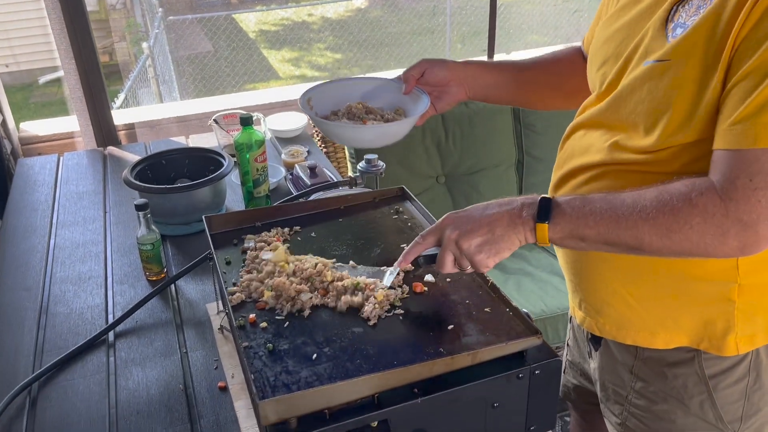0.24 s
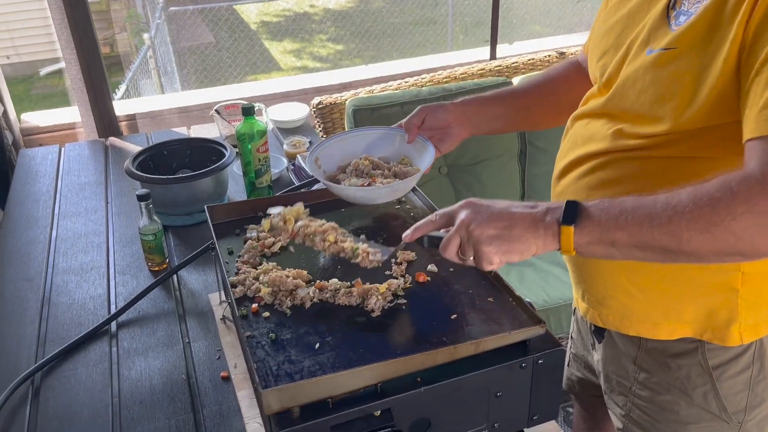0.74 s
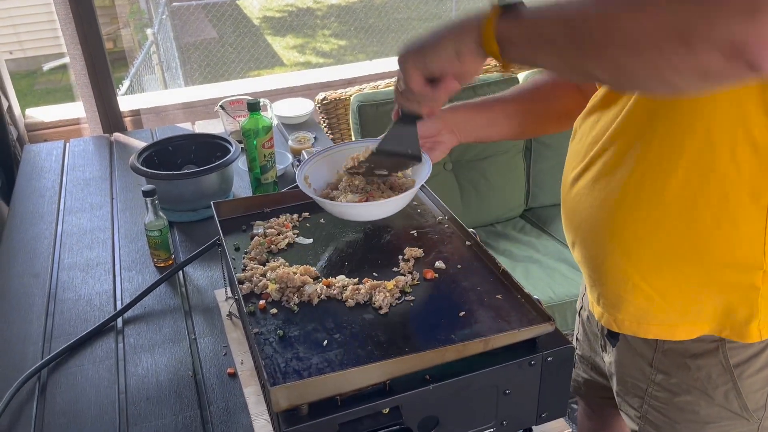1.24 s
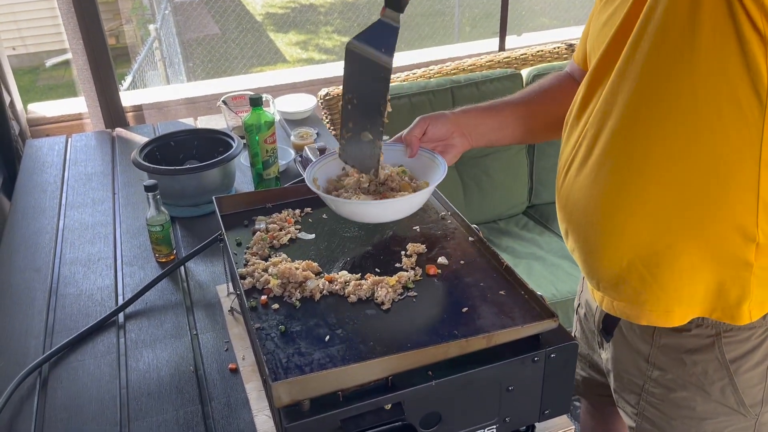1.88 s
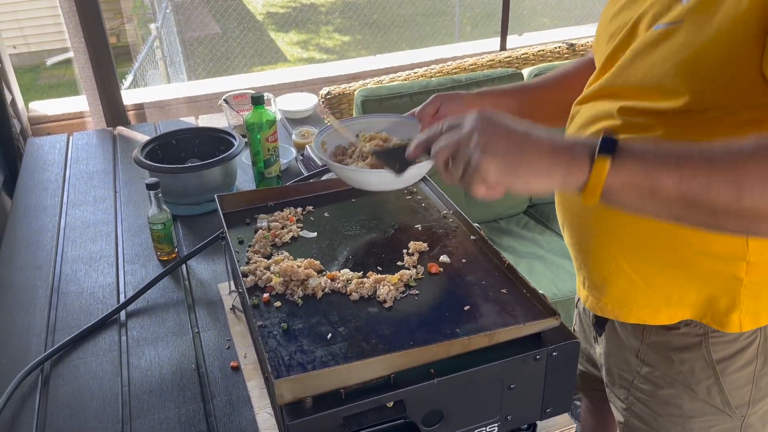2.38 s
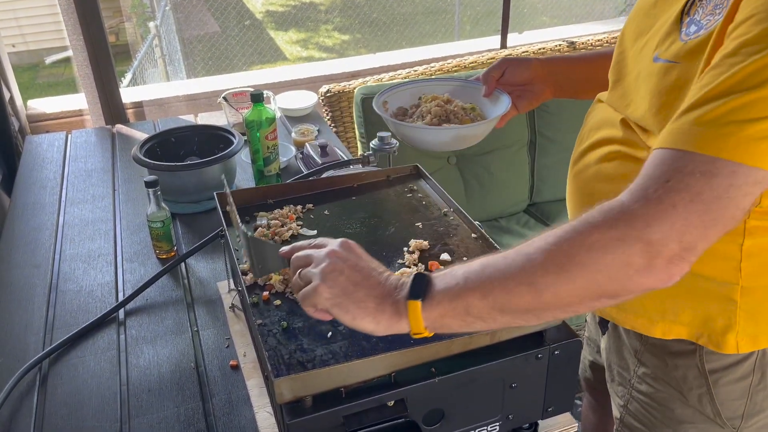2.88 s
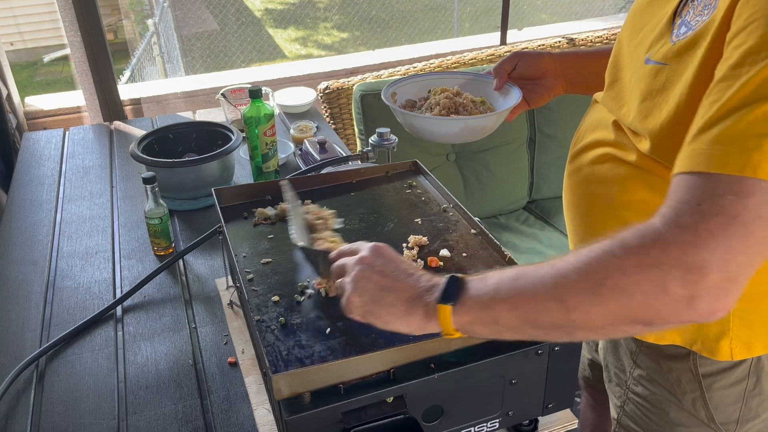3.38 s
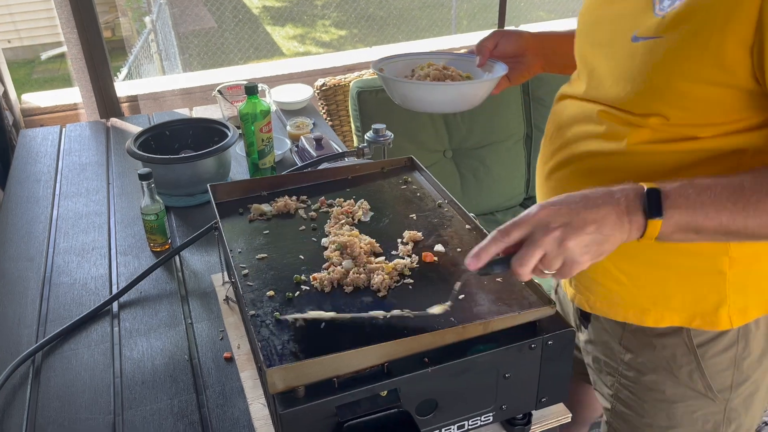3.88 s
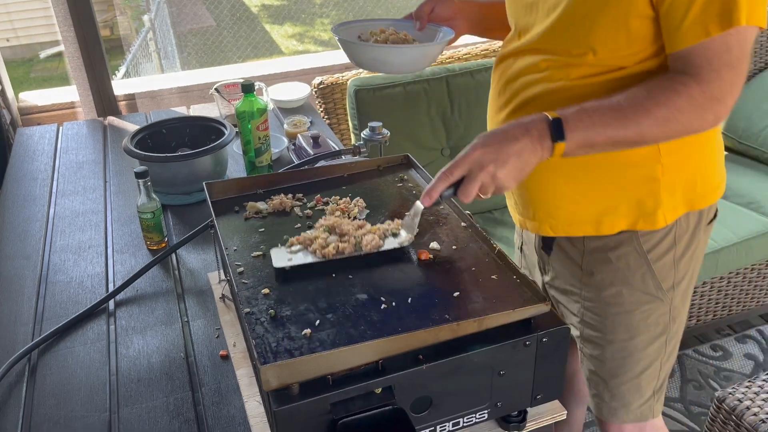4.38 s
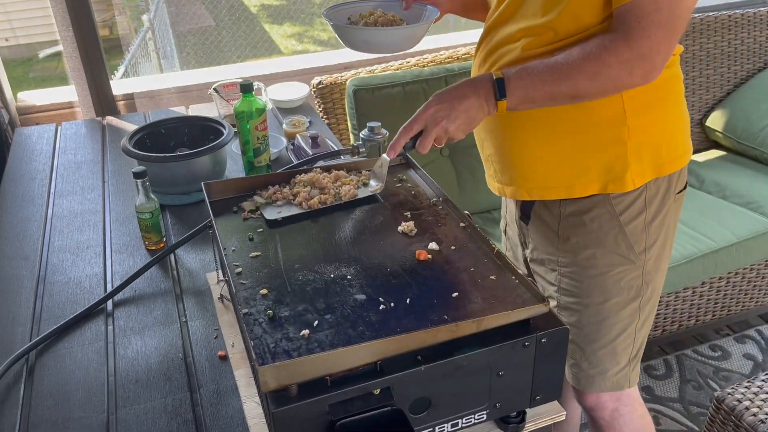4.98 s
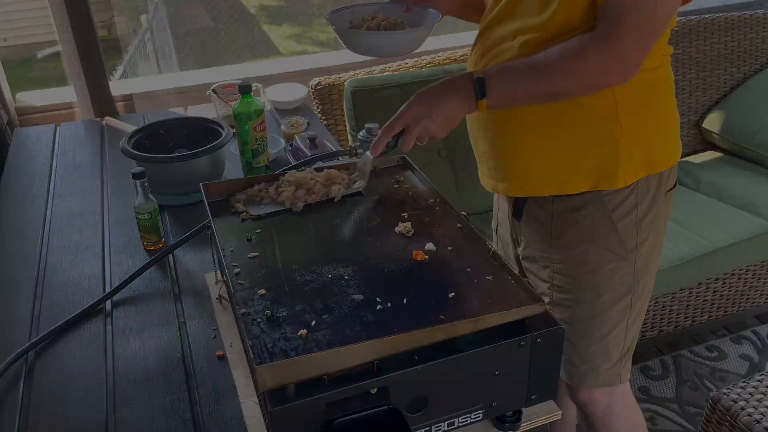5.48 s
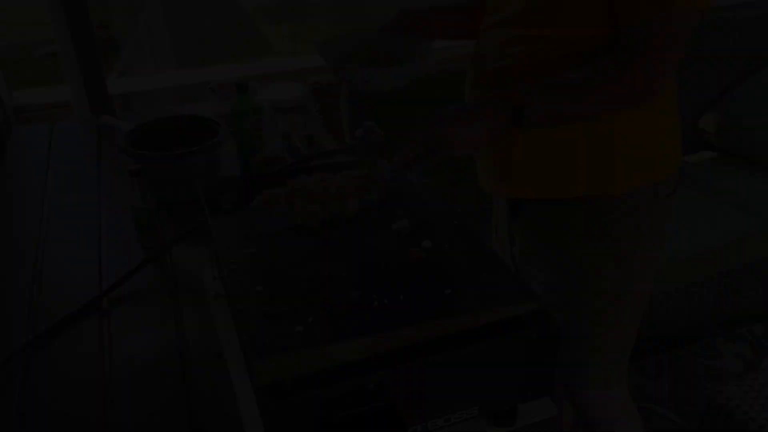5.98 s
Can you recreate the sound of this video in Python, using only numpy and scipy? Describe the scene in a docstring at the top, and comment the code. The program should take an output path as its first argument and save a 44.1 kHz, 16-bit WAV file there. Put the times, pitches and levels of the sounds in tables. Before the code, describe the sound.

Over a far-off mower drone, rice sizzles faintly as a spatula clangs, slaps and scrapes across a griddle.

```python
"""Fried rice on a porch griddle

Close on a stereo pair, a spatula scoops rice off a steel griddle: it clangs on the wall, slaps down
flat, scrapes and squeals along the plate and shoves the heap. The hot plate sizzles faintly and spits
under the porch's short echo. Birds chirp out in the yard; far off, a lawn mower drones in the open air."""
import sys
import numpy as np
from scipy import signal
from scipy.fft import rfft, irfft
from scipy.io import wavfile

SR = 44100
rng = np.random.default_rng(int(sys.argv[2]) if len(sys.argv) > 2 else 0)


def log_audio(samples):
    """Write samples as a 16-bit WAV file to the path given in sys.argv[1]."""
    # one column per channel
    frames = np.atleast_2d(samples).T
    # limit to full scale, then quantise
    limited = np.clip(frames, -1, 1)
    pcm = np.round(limited * 32767).astype(np.int16)
    wavfile.write(sys.argv[1], SR, pcm)


N = 275172
TIME = np.arange(N) / SR
TOP_HZ = 15600
# how alike the two microphones hear close sources, and distant ones: f/Hz, likeness/0-1
NEAR_LIKENESS = [(300, 0.98), (1400, 0.25), (4000, 0.45), (6500, 0.28), (8000, 1), (15000, 0.98)]
FAR_LIKENESS = [(60, 1), (140, 0.69), (290, 0.72), (640, 0.47), (1400, 0), (2000, 0.54), (4500, 0.24),
                (8000, 1)]


def spatula_blow(s, db, edge, modes_db, chatter_s=0.096, rise_s=0.0015):
    """The blade chatters briefly on the steel; an edge blow rings the griddle, a flat one the blade."""
    # modes of the griddle, and of the blade flat on the plate: f/Hz, level/dB, t60/s
    griddle_modes = [(357, -23.5, 0.38), (842, -13, 0.34), (1174, -19, 0.35), (1452, -13.5, 0.12),
                     (2074, -13, 0.27), (2493, -6.5, 0.15), (2945, -2, 0.11), (3174, -8, 0.097),
                     (3480, -5, 0.17), (3580, -2, 0.071), (4120, 0, 0.085), (4165, -6, 0.1),
                     (4500, -9, 0.14), (4824, -7, 0.1), (5400, -7.5, 0.1)]
    blade_modes = [(764, -4, 0.39), (1147, -8.5, 0.2), (1830, -6, 0.27), (2100, -6, 0.25), (2330, -4, 0.13),
                   (3570, -4.5, 0.15), (4100, -6, 0.17), (4748, -7, 0.2), (5970, -15, 0.085),
                   (6560, -3, 0.09)]
    # dense ring of the steel, struck on the wall or flat: f/Hz, level/dB
    wall_spectrum = [(150, -8.5), (450, -14.5), (620, -4), (900, -5.5), (1450, 0.5), (1750, -5),
                     (2500, 0.5), (4000, 4), (5300, -1.5), (6400, -3.5), (7500, -18), (10000, -7),
                     (12000, -28), (14000, -23), (15500, -51)]
    flat_spectrum = [(150, -10), (400, -8), (780, 0.5), (1100, 2.5), (1550, -6), (1900, 0), (3100, -3),
                     (4500, 0.5), (6000, -1), (8000, 0), (11000, -5), (15500, -19)]
    # decay of the dense ring: f/Hz, t60/s
    decays = [(300, 0.8), (900, 0.27), (2000, 0.23), (4000, 0.14), (8000, 0.11), (14000, 0.15)]
    crowd = steely(pair(dying_noise(decays), NEAR_LIKENESS))
    t = np.arange(crowd.shape[1]) / SR
    dense = edge * unit_rms(colour(crowd, wall_spectrum))
    dense += (1 - edge) * unit_rms(colour(crowd, flat_spectrum))
    modes = edge * ringing(griddle_modes, t) + (1 - edge) * ringing(blade_modes, t)
    contact = (1 - np.exp(-t / rise_s)) * (1 + .5 * np.exp(-(t / chatter_s) ** 2))
    ring = (dense + gain_of(modes_db) * modes) * contact * np.cos(np.pi / 2 * t / t[-1]) ** 2
    onset_rms = np.sqrt(np.mean(ring[:, t < .02] ** 2))
    return s, gain_of(db) * ring / onset_rms


def spatula_scrape(bite_s=4.089, lift_s=4.298, attack_s=0.0023, build_s=0.035, release_db_per_s=404,
                   hold_db=-31, slips_per_s=1000, judder_db=1.2, stiffening_hz=63.6, drift_hz=19):
    """Tiny slips of the edge hiss and ring the blade, which stiffens as it bends under the rice."""
    # resonances of the pressed blade: f/Hz, level/dB
    resonances = [(765, -4.5), (1160, -1.5), (1690, -3), (2130, -2), (2330, 1), (2760, 2), (2960, -1),
                  (3440, -1), (3980, 1), (4520, -2), (5130, 0), (5530, -0.5), (5850, -6), (6120, -0.5),
                  (6620, -2), (7070, -1)]
    # rasp of the edge: f/Hz, level/dB
    rasp_spectrum = [(200, -14), (1000, -7.5), (2300, -0.5), (5000, -0.5), (7000, -3.5), (8500, -11),
                     (9400, 9.5), (10400, -7), (11300, -3.5), (12600, -6), (14200, -2), (15200, -38)]
    # extra pressure as the blade meets the heap: middle t/s, half length/s, rise/dB
    pushes = [(4.191, 0.023, 4.5), (4.285, 0.02, 1.5)]
    t = np.arange(0, .4, 1 / SR)
    size, length_s = len(t), lift_s - bite_s
    push_db = swells(pushes, bite_s + t)
    pressure_db = hold_db - 7 * np.exp(-t / build_s) + push_db
    release_db = release_db_per_s * np.maximum(t - length_s, 0)
    pressure = np.minimum(t / attack_s, 1) * gain_of(pressure_db - release_db)
    bend_hz = stiffening_hz * np.minimum(t / length_s, 1) ** 2
    slips = unit_rms((rng.random(size) < slips_per_s / SR) * rng.standard_normal((2, size)))
    friction = pair(rng.standard_normal((2, size)) + .9 * slips, NEAR_LIKENESS)
    friction *= gain_of(judder_db * wander(80)[:size])
    ring = 0
    for hz, db in resonances:
        width_hz = 27 * np.sqrt(hz / resonances[0][0])
        # as the point of contact shifts, each resonance drifts and is caught more or less firmly
        catch = gain_of(db + 2.6 * wander(27)[:size])
        pitch = hz + bend_hz + drift_hz * wander(8.2)[:size]
        mode = resonate(resonate(friction, pitch, width_hz), pitch, 8 * width_hz)
        ring += catch * unit_rms(mode)
    # pushing harder brings out the rasp more than the ring
    rasp = unit_rms(steely(colour(friction, rasp_spectrum))) * gain_of(.35 * push_db)
    return bite_s, pressure * (gain_of(-5) * unit_rms(ring) + gain_of(-1.5) * rasp)


def spatula_squeals(waver_hz=13, roughness=.3):
    """The edge grabs the plate and drives one of the blade's resonances into a short, rough squeal."""
    # grabs of the edge: middle t/s, half length/s, f/Hz, level/dB
    grabs = [(4.157, 0.032, 4020, -39), (4.187, 0.028, 1715, -39.5), (4.19, 0.018, 2150, -40),
             (4.217, 0.02, 5230, -39), (4.255, 0.024, 3490, -39), (4.27, 0.018, 1777, -43),
             (4.28, 0.026, 5170, -42), (4.502, 0.041, 3460, -60), (4.5, 0.03, 5290, -59)]
    out = np.zeros(N)
    for s, half_s, hz, db in grabs:
        phase = 2 * np.pi * np.cumsum(hz + waver_hz * wander(80)) / SR
        tone = unit_rms(np.sin(phase) * (1 + roughness * wander(150)))
        out += tone * swells([(s, half_s, gain_of(db))], TIME)
    return out


def rice_shove(s, length_s, rise_s, db, low_hz, crumbs_per_s=900, octaves=2.97, release_db_per_s=220):
    """Rice cushions the blade: a rustle, crumbs of crust cracking and some of the griddle's hollow."""
    # hollow of the griddle under a heap of rice: f/Hz, width/Hz, level/dB
    hollow = [(603, 97, 18), (840, 46, 12), (1050, 23, 10.5), (1574, 290, 1), (2054, 120, 7), (2560, 89, 1),
              (3265, 55, 0)]
    t = np.arange(0, .3, 1 / SR)
    crumbs = unit_rms((rng.random(len(t)) < crumbs_per_s / SR) * rng.uniform(-0.69, 1, (2, len(t))))
    rub = unit_rms(pair(rng.standard_normal((2, len(t))) + gain_of(-1) * crumbs, NEAR_LIKENESS))
    ring = sum(gain_of(level) * resonate(rub, np.full(len(t), hz), width) for hz, width, level in hollow)
    band = signal.butter(2, [low_hz, min(low_hz * 2 ** octaves, TOP_HZ)], "band", fs=SR, output="sos")
    rustle = unit_rms(signal.sosfilt(band, rub + gain_of(9) * unit_rms(ring)))
    release_db = release_db_per_s * np.maximum(t - length_s, 0)
    return s, rustle * np.minimum(t / rise_s, 1) * gain_of(db - release_db)


def sizzle(calm_db=-68, bursts_per_s=160, small_spits_per_s=6, small_spit_db=-55, spread_db=4):
    """Tiny steam bubbles burst on the plate; oil snaps, its small spits oftener and louder in a flare."""
    # flares where rice meets fresh hot steel: middle t/s, half length/s, rise/dB
    flares = [(.4, 0.41, 3), (3.26, 0.14, 5.5), (4.42, 0.27, 6.5), (4.5, 0.04, 5), (4.97, 0.15, 5.5),
              (5.57, 0.21, 8.5)]
    # colour of the fizz, and of one spit: f/Hz, level/dB
    fizz_spectrum = [(1500, -11), (4000, -5.5), (6500, 3), (9300, 8.5), (11000, 2), (13500, 2.5),
                     (15500, -15)]
    snap_spectrum = [(1500, -12), (6000, -4), (10000, 3.5), (15000, 4.5)]
    # big spits of hot oil: t/s, level/dB
    big_spits = [(0.0195, -41), (0.5665, -43), (0.7189, -47), (0.7776, -43), (0.877, -46), (1.5306, -40),
                 (1.538, -39), (1.5754, -46), (2.2035, -44), (2.2399, -46), (2.3586, -38), (2.409, -43),
                 (3.2354, -44), (5.018, -34), (5.0458, -35), (5.234, -42), (5.3454, -46), (5.3808, -45),
                 (5.4694, -43), (5.7063, -35), (5.7201, -31), (5.7479, -42), (6.0092, -41), (6.1216, -45)]
    flare_db = swells(flares, TIME)
    bursting = rng.random(N) < bursts_per_s / SR
    strength = gain_of(spread_db * np.minimum(rng.exponential(1, N), 4))
    bursts = unit_rms(bursting * strength * rng.choice([-1, 1], (2, N)))
    fizz = unit_rms(colour(rng.standard_normal((2, N)) + gain_of(-7) * bursts, fizz_spectrum))
    spitting = rng.random(N) < small_spits_per_s / SR * gain_of(flare_db)
    pops = spitting * gain_of(small_spit_db + flare_db / 2 + spread_db * rng.uniform(-1.4, 1, N))
    for s, db in big_spits:
        pops[round(s * SR)] = gain_of(db)
    t = np.arange(2048) / SR
    crack, echo = np.exp(-t / .0007), gain_of(-23) * np.exp(-t / .01)
    snap = rng.standard_normal((2, len(t))) * (crack + echo)
    spits = signal.oaconvolve(pops[None], snap, axes=1)[:, :N]
    return fizz * gain_of(calm_db + flare_db) + colour(spits, snap_spectrum)


def porch_echo(x, low_t60=0.4, high_t60=0.2):
    """The open porch answers with a short echo, its treble dying first."""
    tail = dying_noise([(300, low_t60), (10000, high_t60)])
    tail[:, :200] = 0  # gap before the first reflection
    return signal.fftconvolve(x, tail / np.linalg.norm(tail[0]), axes=1)[:, :N]


def birds():
    """Short falling calls from the yard, some hoarse and some clear, blurred by their echoes."""
    # calls: t/s, length/s, start f/Hz, end f/Hz, level/dB, hoarseness as pitch scatter/Hz
    calls = [(0.272, 0.1, 4000, 3850, -70, 110), (.94, 0.089, 3900, 3800, -71, 99),
             (1.3, .09, 3980, 3830, -73, 140), (5.629, 0.063, 3055, 2450, -65, 15),
             (6.005, 0.045, 3050, 2490, -63, 15)]
    out = np.zeros((2, N))
    for s, length_s, start_hz, end_hz, db, scatter_hz in calls:
        size = round(length_s * SR)
        hz = np.linspace(start_hz, end_hz, size) + scatter_hz * wander(250)[:size]
        call = np.sin(2 * np.pi * np.cumsum(hz) / SR) * signal.windows.hann(size)
        add(out, s, gain_of(db) * unit_rms(call))
    return out + porch_echo(out)


def mower(firing_hz=25.05, blade_db=-39, exhaust_db=-46, deck_db=-57.5):
    """Far off, the blade passes four times a firing; the exhaust orders waver on their way over."""
    # exhaust orders: multiple of the firing rate, level/dB
    exhaust_orders = [(3, -17), (5, -10.5), (6, -8), (7, -11.5), (8, -11.5), (9, -19), (10, -16.5),
                      (11, -16), (12, -15.5), (16, -24.5)]
    # whirr of the deck: f/Hz, level/dB
    whirr_spectrum = [(200, -8), (420, 4.5), (700, -2), (1120, 3), (1900, -5.5), (2400, -7), (2680, -2.5),
                      (3100, -12.5), (3600, -15.5), (3950, -13), (4400, -26), (8000, -39)]
    # thick grass drags the governed engine down: middle t/s, half length/s, firing rate lost/Hz
    loads = [(.12, .3, .8), (2.0, .3, 1.0), (3.35, .45, .62), (4.0, .2, 1.05), (5.55, .35, .3),
             (6.13, .26, 1.8)]
    # the blade tone fades and returns as the mower moves: middle t/s, half length/s, depth/dB
    fades = [(1.55, 1.5, 3), (4.68, 0.32, 11), (5.9, 0.073, 9)]
    # the blade tone's octave stands out at first: middle t/s, half length/s, rise/dB
    octave_swells = [(0.1, 0.24, 7), (1.0, 0.5, 3.5)]
    sag_hz = swells(loads, TIME)
    angle = 2 * np.pi * np.cumsum(firing_hz - sag_hz) / SR
    tone = np.cos(4 * angle) * (1 + .054 * wander(7))
    orders = 0
    for order, db in exhaust_orders:
        phase = order * angle + 2 * np.pi * rng.random() + .25 * wander(3)
        octave_db = swells(octave_swells, TIME) if order == 8 else 0
        orders += gain_of(db + octave_db) * (1 + .22 * wander(3)) * np.cos(phase)
    blade = gain_of(blade_db - swells(fades, TIME)) * unit_rms(tone)
    # exhaust and deck quieten under load
    exhaust = gain_of(exhaust_db - 1.5 * sag_hz ** 2) * unit_rms(orders)
    deck = gain_of(deck_db - 2.5 * sag_hz ** 2) * distant_noise(whirr_spectrum)
    return pan(blade + exhaust + deck, left_db=-0.96)


def yard_air(level_db=-48, swell_db=0.8, rumble_hz=500):
    """Diffuse outdoor air: the rumble swells a little, the distant hiss stays even."""
    # air of the yard: f/Hz, level/dB
    air_spectrum = [(20, -30), (35, -12), (50, 1.5), (90, 0), (160, -7.5), (280, -9), (420, -17),
                    (700, -19.5), (1200, -30), (2700, -29), (5000, -30.5), (15000, -54.5)]
    air = distant_noise(air_spectrum)
    rumble = colour(air, [(rumble_hz, 0), (2 * rumble_hz, -40)])
    hiss = air - rumble
    return pan(gain_of(level_db) * (hiss + rumble * gain_of(-swell_db * wander(3.9))), left_db=1.5)


def distant_noise(spectrum):
    """Coloured noise of rms 1, as the pair hears it from far away."""
    return unit_rms(pair(colour(rng.standard_normal((2, N)), spectrum), FAR_LIKENESS))


def ringing(modes, t, spread_rad=0.66):
    """Decaying sines that reach the two microphones slightly out of step."""
    out = 0
    for hz, db, t60 in modes:
        phase = 2 * np.pi * (hz * t + rng.random()) + spread_rad * rng.uniform(-1.5, 1, (2, 1))
        out += gain_of(db - 60 * t / t60) * np.sin(phase)
    return unit_rms(out)


def steely(x):
    """Sheet steel's countless small resonances ripple the spectrum, most of all in the treble."""
    hz = np.arange(0, SR / 2, 70)
    ripple_db = 4.2 * np.minimum(hz / 7000, 1) * np.clip(rng.standard_normal(len(hz)), -2, 1.5)
    return colour(x, np.transpose([hz, ripple_db]))


def dying_noise(decays, size=22050):
    """Two channels of crowded modes, each band dying at its own speed."""
    hz, t, bands = signal.stft(rng.standard_normal((2, size)), SR, nperseg=256)
    decay = gain_of(-60 * t / value_at(decays, hz)[:, None])
    return signal.istft(bands * decay, SR, nperseg=256)[1][:, :size]


def resonate(x, hz, width_hz):
    """A resonance that follows the curve hz."""
    turn = np.exp(2j * np.pi * np.cumsum(hz) / SR)
    pole = np.exp(-np.pi * width_hz / SR)
    return 2 * (turn * signal.lfilter([1 - pole], [1, -pole], x / turn + 1e-18)).real


def pair(x, likeness):
    """Makes two unrelated channels partly alike."""
    left, other = rfft(x)
    size = x.shape[1]
    same = value_at(likeness, np.fft.rfftfreq(size, 1 / SR))
    return irfft(np.array([left, same * left + np.sqrt(1 - same ** 2) * other]), size)


def pan(x, left_db):
    """Places a sound to the left or right."""
    return x * gain_of([[left_db / 2], [-left_db / 2]])


def colour(x, spectrum):
    """Filters by a spectrum of rows f/Hz, level/dB."""
    size = x.shape[-1]
    return irfft(rfft(x) * gain_of(value_at(spectrum, np.fft.rfftfreq(size, 1 / SR))), size)


def wander(rate_hz):
    """Random drift of rms 1, mostly slower than rate_hz."""
    hz = np.fft.rfftfreq(N, 1 / SR)
    return unit_rms(irfft(rfft(rng.standard_normal(N)) * np.exp(-(hz / rate_hz) ** 2), N))


def swells(rows, t):
    """Sum of bell curves, from rows of middle t/s, half length/s, height."""
    return sum(height * np.exp(-((t - s) / half_s) ** 2) for s, half_s, height in rows)


def value_at(points, hz):
    """Reads a table along a logarithmic frequency axis."""
    f, value = np.transpose(points)
    return np.interp(np.log(hz + 1), np.log(f + 1), value)


def add(mix, s, sound):
    """Mixes a sound in at time s."""
    part = mix[..., round(s * SR):][..., :sound.shape[-1]]
    part += sound[..., :part.shape[-1]]


def gain_of(db):
    """Decibels to amplitude."""
    return 10 ** (np.asarray(db) / 20)


def unit_rms(x):
    """Scales to rms 1."""
    return x / np.sqrt(np.mean(x ** 2) + 1e-20)


def scene(echo_db=-15):
    """The griddle close to the microphones on the porch, the yard behind it."""
    # spatula blows: t/s, level/dB, contact (0 flat on the plate, 1 edge on the wall), clear modes/dB
    blows = [(3.059, -17, 0.96, 1.5), (3.0773, -27, 0.78, 3), (3.9, -28, .02, -3)]
    # soft shoves through the rice: t/s, length/s, rise/s, level/dB, lowest f/Hz
    shoves = [(0.2, 0.022, 0.0086, -54.5, 2980), (0.249, 0.021, 0.0089, -52.5, 940),
              (4.368, 0.088, 0.023, -54, 1200), (4.455, 0.065, 0.041, -45, 1520),
              (4.869, 0.11, 0.057, -57.5, 1170), (5.188, 0.049, 0.021, -55, 1120),
              (5.435, 0.009, 0.004, -52, 1090), (5.444, 0.098, 0.029, -49.5, 477)]
    # how much the steel favours the left microphone: f/Hz, left over right/dB
    leftward = [(400, -4), (1200, 0.5), (2400, -0.5), (4400, 4.5), (8000, -0.5)]
    steel = np.zeros((2, N))
    for row in blows:
        add(steel, *spatula_blow(*row))
    add(steel, *spatula_scrape())
    steel += spatula_squeals()
    for row in shoves:
        add(steel, *rice_shove(*row))
    for side, sign in enumerate((1, -1)):
        steel[side] = colour(steel[side], [(hz, sign * db / 2) for hz, db in leftward])
    near = steel + pair(sizzle(), NEAR_LIKENESS)
    echo = gain_of(echo_db) * pair(porch_echo(near), NEAR_LIKENESS)
    return near + echo + mower() + yard_air() + birds()


def record(dry):
    """The two microphone ports part in phase through the treble; the band ends at TOP_HZ."""
    # phase between the ports: f/Hz, lead of the left/rad
    port_phase = [(350, 0), (900, .8), (2000, .4), (4400, .65), (6100, -1), (8350, -3.14), (10000, -4.6),
                  (11500, -6.1), (12700, -6.6), (14000, -7.9), (15500, -9.4)]
    turn = np.exp(.5j * value_at(port_phase, np.fft.rfftfreq(N, 1 / SR)))
    heard = irfft(rfft(dry) * np.array([turn, turn.conj()]), N)
    lowpass = signal.firwin(255, TOP_HZ, window=("kaiser", 9), fs=SR)
    return signal.oaconvolve(heard, lowpass[None], "same")


dry = scene()
out = record(dry)
log_audio(out)
```